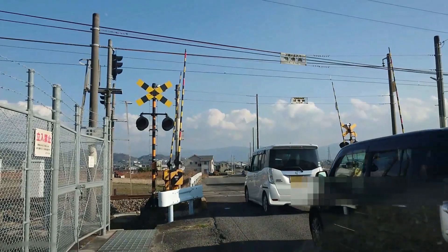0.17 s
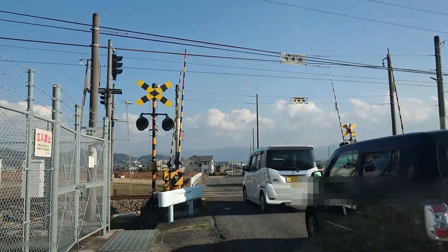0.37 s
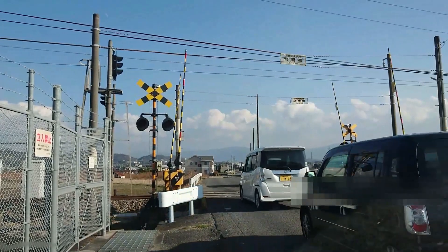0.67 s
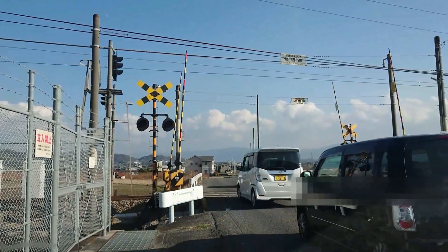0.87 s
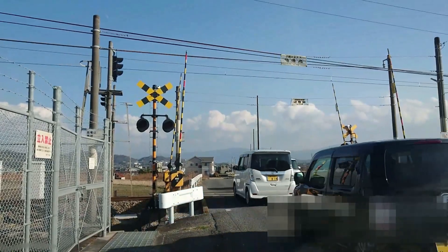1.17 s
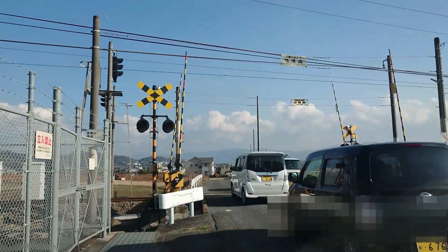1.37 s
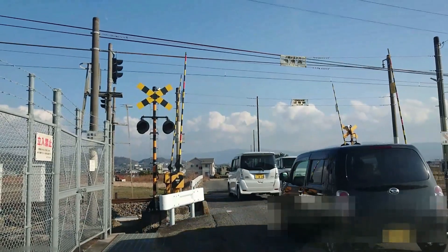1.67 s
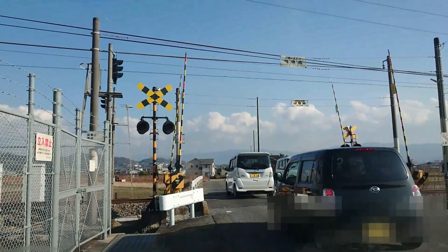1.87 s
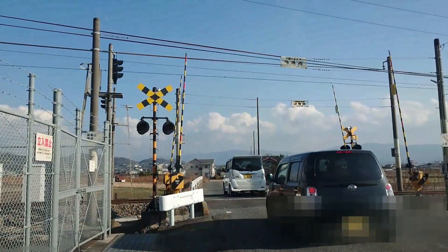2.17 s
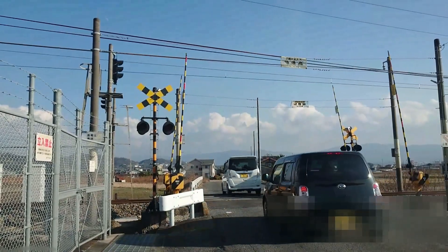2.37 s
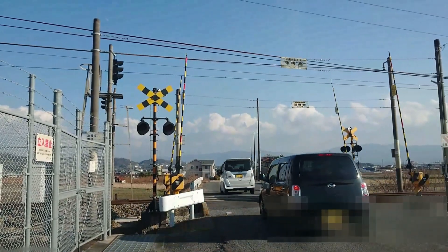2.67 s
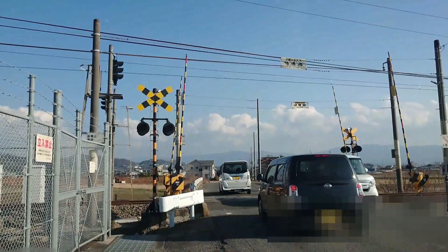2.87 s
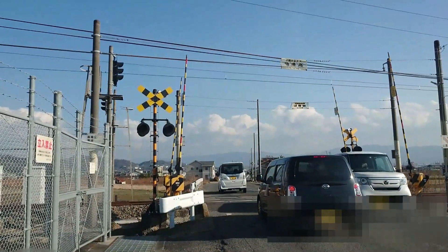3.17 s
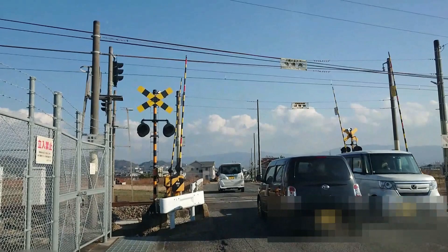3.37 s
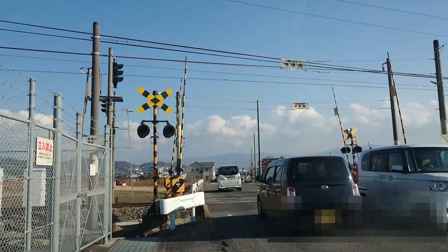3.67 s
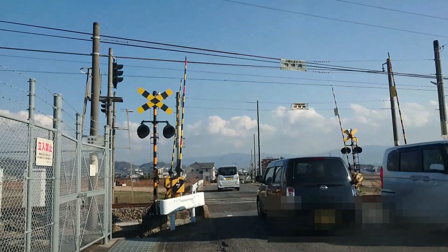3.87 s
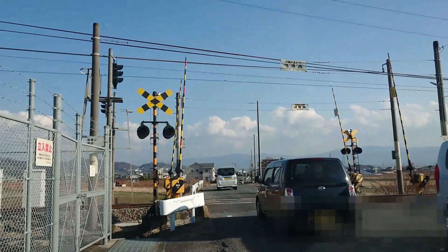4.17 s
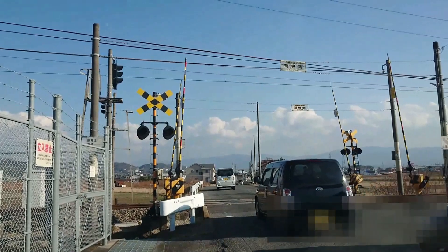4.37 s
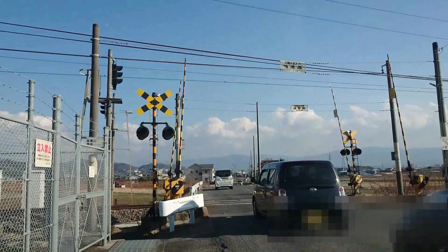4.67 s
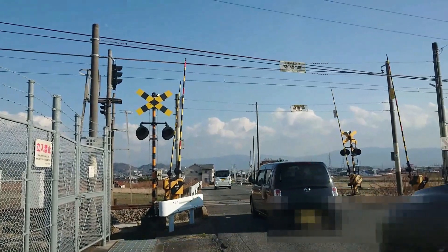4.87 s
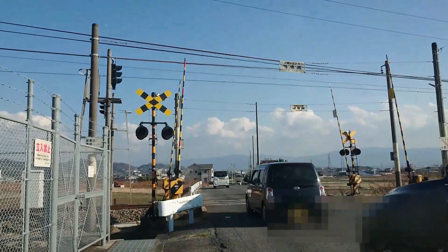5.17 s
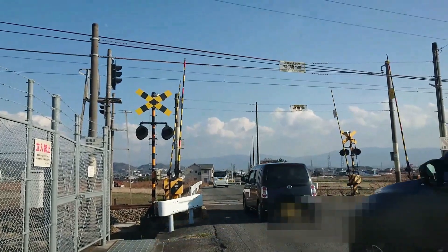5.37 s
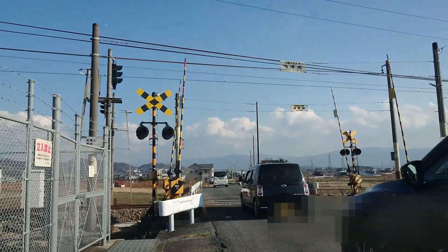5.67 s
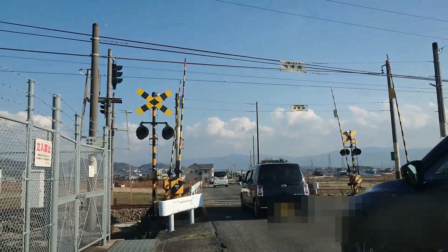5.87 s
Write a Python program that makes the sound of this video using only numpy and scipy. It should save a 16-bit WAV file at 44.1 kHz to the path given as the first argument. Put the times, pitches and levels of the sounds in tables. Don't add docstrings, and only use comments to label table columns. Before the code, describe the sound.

Slow traffic passes close at a level crossing: humming idling engines, dull wheel thumps, gritty tyre scrapes and buffeting gusts, swelling before a sudden cut.

```python
import sys
import numpy as np
from scipy import signal
from scipy.fft import rfft, irfft, next_fast_len
from scipy.io import wavfile
from scipy.ndimage import uniform_filter1d, map_coordinates

SR = 44100
rng = np.random.default_rng(int(sys.argv[2]) if len(sys.argv) > 2 else 0)


def invert_db(level):
    return 10 ** (np.asarray(level, dtype=float) / 20)


def digitize_waveform(pressure):
    field = np.atleast_2d(pressure).T
    bounded = np.clip(field, -1, 1)
    quanta = np.round(bounded * 32767).astype(np.int16)
    wavfile.write(sys.argv[1], SR, quanta)


N = 265923
T = np.arange(N) / SR
BASS_LAG, ROAR_LAG, ECHO_LAG, BESIDE_LAG = 9, 8, 39, 17


def unit(x):
    return x / np.sqrt(np.mean(x ** 2))


def curve(points, **ends):
    return np.interp(T, *np.transpose(points), **ends)


def bump(s, half):
    return np.clip(1 - np.abs(T - s) / half, 0, 1)


def walk(rate):
    hold = int(SR / 64 / rate) + 1
    held = np.repeat(rng.standard_normal(400), hold)[:N // 64 + 2]
    slewed = uniform_filter1d(uniform_filter1d(held, hold), hold)
    return 1.3 * np.interp(T, np.arange(len(held)) * 64 / SR, slewed)


def ring(x, hz, t60):
    pole = np.exp(2j * np.pi * hz / SR - np.log(1000) / (t60 * SR))
    return signal.lfilter([1], [1, -pole], x).imag


def shaped(x, shape, outside_db):
    size = next_fast_len(N, True)
    hz, db = np.transpose(shape)
    log_hz = np.log(np.maximum(np.arange(size // 2 + 1) * SR / size, 1))
    gain_db = np.interp(log_hz, np.log(hz), db, left=outside_db, right=outside_db)
    return irfft(rfft(x, size) * invert_db(gain_db), size)[:N]


def patchy(shape, patchy_db, rate):
    noise = shaped(rng.standard_normal(N), shape, outside_db=-120)
    f, t, tiles = signal.stft(noise, SR, nperseg=1024, noverlap=768)
    flicker = np.array([np.interp(t, T[::64], walk(rate)[::64]) for _ in range(20)])
    band = np.clip(2 * np.log2(np.maximum(f, 1) / 30), 0, 19)
    grid = np.meshgrid(band, range(len(t)), indexing="ij")
    db = patchy_db * map_coordinates(flicker, grid, order=1)
    return unit(signal.istft(tiles * invert_db(db), SR, nperseg=1024, noverlap=768)[1][:N])


def apart(shape, patchy_db, rate):
    return np.array([patchy(shape, patchy_db, rate) for _ in range(2)])


def pan(db):
    return invert_db(np.array([db, -db]) / 2)


def ports(x, lag, pan_db):
    late = np.interp(T - lag / SR, T, x)
    return np.array([late * invert_db(pan_db / 2), x * invert_db(-pan_db / 2)])


def place(s, shapes):
    out = np.zeros((2, N + SR))
    for t, shape in zip(s, shapes):
        start = int(t * SR)
        out[:, start:start + shape.shape[-1]] += shape
    return out[:, :N]


def trackside_hum():
    hum = invert_db(-53 + 1.2 * walk(4)) * np.sin(2 * np.pi * 365 * T)
    return ports(hum, 0, 9.3)


# start_s, length_s, level_db, port (0 left, 1 right)
GUSTS = [(-.1, 0.25, -7, 0), (0.16, 0.19, -19.5, 0), (0.333, 0.2, -16, 0), (-.1, 0.36, -20, 1),
         (0.478, 0.1, -22.5, 1), (0.977, 0.2, -21, 1), (3.422, 0.19, -25.5, 1), (4.091, 0.54, -32.5, 1),
         (5.1, 0.21, -30, 1), (5.301, 0.26, -32, 0), (3.337, 0.16, -42, 0)]


def wind():
    colour = [(25, -29.5), (50, -7.5), (90, 9.5), (160, -5.5), (300, -20.0), (600, -53.0), (1200, -45.0)]
    strength = np.zeros((2, N))
    for s, length, db, port in GUSTS:
        strength[round(port)] += invert_db(db) * np.sin(np.pi * np.clip((T - s) / length, 0, 1))
    return apart(colour, 7.0, 25) * strength


# start_s, level_db (peak), left_minus_right_db, pitch_hz, snap_db
SLAPS = [(.008, -12.5, -28, 128.4, -52.5), (0.1019, -2.5, -17, 170, -26.5), (0.113, -9.5, -24, 126, -21),
         (0.512, -14, -24, 121, -34), (0.5579, -10, -25, 105, -57), (1.7674, -8, -15.5, 160, -36),
         (3.401, -9.5, -27, 122, -42), (3.7867, -21, -29, 420, -16), (3.7932, -31, -14, 503.9, 4),
         (3.8081, -13.5, 40, 200, -35), (3.8107, -13.5, -24, 149, -31), (4.6016, -11, -28, 380, -2.5),
         (4.6223, -30.5, -20.5, 300, 7.5), (4.6268, -30, -20, 300, 17), (5.182, -21.5, -22.5, 201, -14),
         (4.615, -27, -19, 300, 1), (4.553, -24.5, -22.5, 330, -13.5), (4.571, -23, -21, 332, -12),
         (4.6246, -27.5, -19, 500, -4), (4.223, -24.5, -26, 200, -16)]


def slaps():
    t = np.arange(SR // 10) / SR
    grit = rng.standard_normal((len(SLAPS), len(t)))
    shapes = []
    for (s, db, pan_db, hz, snap_db), noise in zip(SLAPS, grit):
        turns = hz * t + .36 * (1 - np.exp(-t / .0005)) - .2 * (1 - np.exp(-t / .0025))
        swell = (1 - np.exp(-t * hz / .5)) * np.exp(-t * hz / 0.47)
        push = -3.2 * np.sin(2 * np.pi * turns) * swell
        hollow = 0.62 * unit(ring(ring(noise, 650, 0.0049), 1000, .003))
        knock = hollow + 1.5 * np.sin(2 * np.pi * 850 * t)
        snap = invert_db(snap_db) * knock * np.exp(-t / 0.0012) * (1 - np.exp(-t / 0.00042))
        far_port_db = np.minimum([[pan_db], [-pan_db]], 0)
        shapes.append(invert_db(db + 7.0 + far_port_db) * (push + snap))
    return place(np.array(SLAPS)[:, 0], shapes)


# start_s (peak), half_length_s,
# roar_db, hiss_db, rumble_db
SCUFFS = [
    (3.79, 0.098, 2.5, 2, 2.5),
    (4.23, .07, 1, 4, 0.5),
    (4.598, 0.073, 4.5, 4, 7.5),
    (4.635, .025, 3.5, 9, 3.5),
    (2.39, .08, -1, -0.7, 5),
    (2.88, .06, 2, -0.5, 1.5),
]


def scuff_db():
    return sum(np.outer(dbs, bump(s, half)) for s, half, *dbs in SCUFFS)


# start_s, level_db over usual
NEARNESS = [(0, 1), (.5, 1.5), (.87, 0), (1.3, 3.5), (1.8, -0.5), (2.8, -1), (3.6, 0), (4.3, -0.5),
            (4.75, 1), (5.02, 3.5), (5.2, 11.5), (5.32, 10.5), (5.4, 12.5)]


def near_db():
    return curve(NEARNESS)


# pitch_hz, level_db per Hz
RUMBLE = [(18, -37), (30, 2.5), (43, -11), (59, -2.5), (86, -11), (146, -20.5), (178, -13), (257, -29),
          (297, -26.5), (649, -45.5), (900, -40.5), (1170, -63.5), (1980, -120)]
# start_s, level_db
JOLTING = [(0, 0.5), (.06, -23), (.19, -4.5), (.48, -3.5), (.75, -5), (1.1, 3), (1.7, -1.5), (2.2, 2),
           (2.9, 1.5), (3.1, -4), (3.6, -2.5), (3.8, -0.5), (4.36, 0), (5.2, 1.5), (5.4, 8)]


def body_rumble():
    shared = ports(patchy(RUMBLE, 2.7, 16), BASS_LAG, -0.53)
    rumble = shared + invert_db(-3.0) * apart(RUMBLE, 1.1, 30)
    return invert_db(-24 + curve(JOLTING) + scuff_db()[2]) * rumble


# pitch_hz, level_db per Hz
ROAR = [(350, -12), (600, -3.5), (764, -14), (1130, -6), (1230, -8), (1410, -8), (2380, -5), (2750, -13.5),
        (4240, -13), (4910, -18.5), (5930, -16.5), (6880, -18.5), (7400, -25), (9620, -61.5), (16300, -120)]


def tyre_roar():
    scuff = scuff_db()
    alike = [(500, 4.0), (1800, -2.0), (3500, -9.0), (7500, -19.5)]
    near = shaped(patchy(ROAR, 1.5, 18), alike, outside_db=8.5)
    direct = invert_db(-1.0) * ports(near, ROAR_LAG, 0)
    left_echo = invert_db(-7.5) * ports(near, ECHO_LAG, 0) * [[1], [0]]
    roar = direct + left_echo + invert_db(1.5) * apart(ROAR, 0.94, 13)
    return invert_db(-46.5 + near_db() + scuff[0]) * pan(4 - 1.3 * scuff[1]) * roar


# pitch_hz, level_db per Hz
HISS = [(4470, -53), (7600, -30.5), (8010, -10), (9080, -14), (9540, -3.5), (10000, -3.5), (11500, -6),
        (14100, -8), (15100, -11.5), (16000, -20.5)]
# start_s, ticks_per_s
TICK_HZ = [(0, 21.4), (1.8, 21.2), (2.2, 22.6), (2.6, 25), (3.1, 27.5), (3.6, 25.5), (5.4, 25)]
# start_s, ratio
TICK_DEPTH = [(0, 0.28), (.7, 0.76), (1.9, 0.59), (3.2, 0.71), (4, 0.23), (5.4, 0.16)]
# start_s, left_minus_right_db
HISS_PAN_DB = [(0, 13.3), (1.0, 7.7), (2.5, 3.7), (4, 7.3), (5.4, 5.16)]


def valve_hiss():
    scuff = scuff_db()
    turn = np.cumsum(curve(TICK_HZ)) / SR
    puff = np.exp(-((turn % 1 - .5) / 0.17) ** 2)
    puff = puff * invert_db(2.5 * rng.standard_normal(200))[turn.astype(int)]
    puff = puff * curve(TICK_DEPTH)
    steady = invert_db(-2.0) * patchy(HISS, 1.1, 18) + apart(HISS, 0.8, 17)
    hiss = steady * (1 + puff * np.array([[1], [.4]]))
    pan_db = curve(HISS_PAN_DB) - 1.3 * scuff[1]
    return invert_db(-53.5 + 0.83 * near_db() + scuff[1]) * pan(pan_db) * hiss


# start_s, level_db (peak), pitch_hz (ring), rattle_db
RAILS = [(0.346, -25, 332, -2), (0.967, -18, 189, -27), (1.638, -20.5, 206.5, -5), (1.675, -18, 204, -0.5),
         (1.718, -25, 196, 6), (2.094, -22.5, 212, 5), (2.284, -31, 220, 7), (2.317, -24, 205, 8),
         (2.341, -20.5, 213, -8), (2.355, -26.5, 243, 8.5), (2.394, -12.5, 184.3, -0.5),
         (2.371, -13.5, 129.5, -5), (2.407, -19.5, 110, -15), (2.439, -24.5, 213, 4), (2.598, -25, 228, -1),
         (2.826, -16, 192, -2.5), (2.869, -7, 180, -7), (4.886, -17, 187.4, -7), (4.949, -25, 198.6, 0),
         (5.012, -23.5, 205, -9), (5.06, -19, 209, -4.5)]


def rails():
    t = np.arange(SR // 4) / SR
    grains = rng.standard_normal((len(RAILS), len(t))) ** 3
    rattle = signal.lfilter([1], [1, -.9], grains)
    fade = 10 ** (-3 * t / 0.13)
    shapes = []
    for (s, db, hz, rattle_db), noise in zip(RAILS, rattle):
        modes = np.sin(2 * np.pi * hz * t) + 0.24 * np.sin(2 * np.pi * .88 * hz * t)
        body = modes * (1 - np.exp(-t / 0.0035))
        panels = unit(ring(noise, 570.0, 0.007))
        shake = invert_db(rattle_db - 1.5) * panels * (1 - np.exp(-t / 0.01)) ** 2
        shapes.append(invert_db(db) * fade * np.array([body, shake]))
    bodies, shakes = place(np.array(RAILS)[:, 0], shapes)
    return ports(bodies, BASS_LAG, -0.62) + ports(shakes, ECHO_LAG, 0.1)


# start_s, level_db (peak), left_minus_right_db, pitch_hz, edge_db (bright edge)
CLICKS = [(0.102, -26, -13.5, 4620, -1), (0.1114, -29, -7, 4900, -8), (1.7674, -42, -11, 4870, -8),
          (3.7869, -33, 0.5, 3590, -16), (3.7868, -26, -14.5, 1430, -14), (4.6268, -33, -15.5, 1396, -21),
          (0.1018, -35, -5, 1380, -17), (2.402, -24.5, 2, 1300, -20), (3.7934, -37, -8, 4394, 2),
          (0.872, -33.5, 16, 2454, 1), (1.225, -35, 2, 2232, 9), (1.6608, -29.5, -7, 4445, -14),
          (1.673, -36, 4, 3580, 2), (1.7724, -35, 13, 4020, 11), (1.8023, -38.5, 2, 4520, 12),
          (0.0707, -44, 6.5, 4000, 10), (0.4449, -44, 10.5, 4000, 10), (0.7312, -55, 11, 3900, 9),
          (3.48, -29.5, 1.5, 4600, -1), (3.7873, -23, 6, 2550, -17), (3.81, -33.5, 17, 3000, 4.5),
          (4.2242, -33.5, -3.5, 5930, 7.5), (4.6227, -27, 5, 2210, -16), (4.626, -33, 13.5, 4860, 2)]


def clicks():
    t = np.arange(SR // 10) / SR
    grit = rng.standard_normal((len(CLICKS), 2, len(t)))
    bright = signal.butter(4, 9200, "high", fs=SR, output="sos")
    envelope = (1 - np.exp(-t / 0.00081)) * np.exp(-t / 0.0037)
    shapes = []
    for (s, db, pan_db, hz, edge_db), noise in zip(CLICKS, grit):
        dull = 0.85 * unit(ring(noise, hz, 0.001))
        ping = 1.5 * np.sin(2 * np.pi * hz * t) * np.exp(-t / 0.0012)
        edge = invert_db(edge_db + 5) * unit(signal.sosfilt(bright, noise)) * np.exp(-t / 0.00402)
        level = invert_db(db - 3.5 + np.array([[pan_db], [-pan_db]]) / 2)
        shapes.append(level * (dull + ping + edge) * envelope)
    return place(np.array(CLICKS)[:, 0], shapes)


# start_s, level_db
ARRIVAL = [(4.85, -67.5), (5.0, -45.5), (5.06, -41), (5.12, -43.5), (5.18, -35), (5.3, -41), (5.41, -49)]
# pitch_hz, level_db per Hz
ARRIVAL_COLOUR = [(250, -13), (350, -2.5), (450, -12.5), (800, -25), (1150, 9.5), (1500, 11.5),
                  (1900, -11.5), (2600, 8.5), (2900, -15), (6500, -11)]


def arrival():
    shared = ports(patchy(ARRIVAL_COLOUR, 2.8, 30), BESIDE_LAG, 2.9)
    separate = invert_db(-4.0) * apart(ARRIVAL_COLOUR, 2.9, 30)
    return invert_db(curve(ARRIVAL, left=-120)) * (shared + separate)


# start_s, pitch_hz, level_db
WHINE = [(1.18, 1100, -62), (1.27, 1105, -45), (1.36, 1110, -41), (1.47, 1150, -45), (1.53, 1110, -52),
         (1.6, 1085, -49), (1.72, 1080, -60)]


def belt_whine():
    s, hz, db = np.transpose(WHINE)
    sway, breaks_db = 1 + .022 * walk(60), 1.5 * walk(30)
    phase = 2 * np.pi * np.cumsum(np.interp(T, s, hz) * sway) / SR
    level_db = np.interp(T, s, db, left=-120, right=-120) + breaks_db
    return ports(invert_db(level_db) * np.sin(phase), ROAR_LAG, 3.5)


# pitch_hz, half_width_hz, level_db
BOOMS = [(98.7, 5.6, 12), (192, 13, 14)]


def engine(table, wobble, rough_db, upper_db=(), dip_db=0):
    s, hz, db = np.transpose(table)
    speed = np.interp(T, s, hz)
    note_db = np.interp(T, s, db)
    phase = 2 * np.pi * np.cumsum(speed * (1 + wobble * walk(14))) / SR
    already_on = (s[0] < .01) * (T < 1)
    gate = np.clip(np.minimum(T - s[0], s[-1] + .05 - T) / .05 + already_on, 0, 1)
    load_db = 0.42 * (note_db - np.max(db))
    dbs = [note_db - dip_db]
    for multiple, level_db in enumerate(upper_db, 2):
        boom_db = sum(gain / (1 + ((multiple * speed - centre) / width) ** 2) for centre, width, gain in BOOMS)
        dbs.append(level_db + load_db + boom_db)
    note = 0
    for k, multiple_db in enumerate(dbs):
        size = invert_db(multiple_db + (k + 2.0) * rough_db * walk(20))
        note = note + size * np.sin((k + 1) * (phase + k))
    return gate * np.sqrt(2) * note


# start_s, pitch_hz, level_db
DRONE = [(.1, 572, -67), (.3, 600, -55.5), (.47, 589.5, -52.5), (.6, 608, -54), (.77, 602, -53),
         (.9, 625, -63), (1.1, 614, -54)]
# start_s, pitch_hz, level_db
GEARS = [
    [(.85, 511, -49), (1.05, 499, -62), (1.25, 504, -48), (1.4, 496, -58)],
    [(1.45, 703, -45), (1.55, 694, -52), (1.63, 686, -53)],
    [(2.05, 601, -53), (2.3, 605.5, -49), (2.45, 609, -51.5), (2.7, 584, -57)],
]
# start_s, pitch_hz, level_db
INTAKE = [(5.05, 356.7, -55), (5.15, 358.8, -39), (5.3, 350.2, -40.5), (5.4, 339, -43)]


def whirrs():
    fan = ports(engine(DRONE, wobble=0.044, rough_db=2.5), ROAR_LAG, 1.5)
    gears = sum(ports(engine(gear, wobble=.02, rough_db=2.0), ROAR_LAG, 1.5) for gear in GEARS)
    intake = ports(engine(INTAKE, wobble=0.02, rough_db=-0.5), BASS_LAG, -2)
    return fan + gears + intake


# start_s,
# pitch_hz, level_db
IDLER = [(0.0, 53.2, -5), (0.042, 50.9, -11.5), (0.136, 52.5, -26), (0.236, 57.14, -20.5),
         (0.45, 60.84, -28.5), (0.788, 49.3, -34), (1.05, 48, -25)]
CREEPER = [(0.55, 68, -24), (0.63, 64.2, -37), (1.216, 66.9, -30), (1.45, 72, -53), (1.87, 71, -73),
           (2.17, 65.9, -29), (2.3, 69, -51)]
CREEPER_SECOND = [(.6, 126.7, -49), (.75, 129.7, -41), (1.1, 131.3, -38), (1.4, 137.8, -42.5), (1.65, 142, -49)]
STARTER = [(1.0, 43.15, -39), (1.13, 45.56, -28.5), (1.276, 50.5, -15.5), (1.36, 56.56, -19),
           (1.59, 60.8, -29.5), (1.62, 60, -25)]
IDLER_LATER = [(1.55, 47.8, -40), (1.6, 48.1, -30), (2.004, 48, -21), (2.076, 43.6, -30), (2.14, 44.6, -26),
               (2.262, 46.8, -24), (2.344, 48, -52), (2.4, 46.5, -18)]
LEADER = [(2.35, 53.5, -18), (2.67, 54.8, -20), (2.85, 49.3, -9.5), (3.2, 52.72, -16.5), (3.5, 49.93, -24),
          (3.87, 59.36, -21), (4.19, 56.45, -18.5), (4.9, 58.75, -16), (5.4, 60.65, -25.5)]
CREEPER_LATE_SECOND = [(2.5, 123.1, -26), (2.6, 125.9, -39), (3.236, 139.7, -43), (3.51, 126.5, -39.5),
                       (3.8, 129.6, -36.5), (3.9, 125.3, -31.5)]
BRAKER = [(3.45, 176, -46), (3.7, 178.5, -39.5), (4.0, 176, -42), (4.3, 167, -37), (4.4, 167, -55)]
LEADER_SECOND = [(4.2, 113.1, -65), (4.4, 113.9, -34), (4.8, 116.4, -35), (5.1, 118.6, -32), (5.4, 115.4, -31)]
FOLLOWER = [(4.3, 36.63, -50), (4.47, 44.8, -19), (4.505, 48.7, -17), (4.55, 50.8, -20.5), (4.61, 52, -9),
            (4.655, 54.3, -21), (4.7, 57.5, -25.5), (5.0, 65.38, -19.5), (5.2, 69.83, -22),
            (5.33, 72.3, -30), (5.4, 78.7, -19)]
# start_s (deepest), drop_db, half_length_s
NOTE_DIPS = [(2.459, 26, 0.047), (2.57, 16, 0.054), (2.813, 23, 0.12), (3, 14.5, 0.16), (3.36, 7.5, 0.11),
             (3.785, 25, 0.017), (4.08, 15, 0.033), (4.757, 31, 0.046), (4.575, 33, 0.13)]


def engines():
    dips_db = sum(drop_db * bump(s, half) for s, drop_db, half in NOTE_DIPS)
    # (car, left minus right dB, 2nd and 3rd multiple dB)
    cars = [(IDLER, 1.5, ()), (IDLER_LATER, 1.5, ()), (CREEPER, .1, (-39,)), (CREEPER_SECOND, .1, ()),
            (CREEPER_LATE_SECOND, .1, ()), (STARTER, 2.5, (-36, -48)), (LEADER, 3, (-45, -50)),
            (LEADER_SECOND, 1.5, ()), (BRAKER, 1.5, ()), (FOLLOWER, 3, (-37, -39))]
    out = np.zeros((2, N))
    for car, pan_db, upper_db in cars:
        dip_db = dips_db * (car is LEADER)
        note = engine(car, wobble=0.0051, rough_db=0.7, upper_db=upper_db, dip_db=dip_db)
        out += ports(note, BASS_LAG, pan_db)
    return out


# pitch_hz, left_minus_right_db
PORT_TILT = [(200, -2), (700, 0.5), (1300, -1), (2400, 5.5), (3300, 2.5), (4500, -2.5), (7000, -4),
             (10000, 4.5), (13000, -4.5), (15500, -5.5)]


def scene():
    road = body_rumble() + tyre_roar() + valve_hiss()
    traffic = [shaped(x, np.array(PORT_TILT) * [1, side], outside_db=-5.0) for x, side in zip(road, (.5, -.5))]
    background = trackside_hum() + wind() + slaps()
    return background + traffic + rails() + clicks() + arrival() + belt_whine() + whirrs() + engines()


# pitch_hz, chance
DROPOUT = [(4800, 0), (5500, .06), (6300, .27), (7000, .6), (7600, .8), (8300, .65), (9000, .45),
           (9500, .03), (11500, .08), (12600, .17), (13800, .33), (14600, .5), (15200, .75), (15800, .9)]


def starved(x):
    f, t, tiles = signal.stft([x[0] + x[1], x[0] - x[1]], SR, nperseg=1024)
    luck = rng.random((len(f) // 8 + 1, len(t) // 3 + 1))
    luck = np.repeat(np.repeat(luck, 8, axis=0), 3, axis=1) / [[[1]], [[1.1]]]
    kept = luck[:, :len(f), :len(t)] > np.interp(f, *np.transpose(DROPOUT))[:, None]
    mid, side = signal.istft(tiles * kept, SR, nperseg=1024)[1][:, :N]
    return np.array([mid + side, mid - side]) / 2


def band_limit(x):
    return signal.sosfilt(signal.butter(12, 16480, fs=SR, output="sos"), x)


# start_s, level_db
CUT = [(0, -24), (.006, 0), (5.402, 0), (5.408, -8), (5.42, -34), (5.438, -44), (5.446, -70), (5.47, -110)]


def record(dry):
    low_cut = signal.butter(6, 36, "high", fs=SR, output="sos")
    top_cut = signal.ellip(10, .3, 70, 15700, fs=SR, output="sos")
    dead_spot = signal.butter(1, [7300, 8200], "bandstop", fs=SR, output="sos")
    overloaded = np.tanh(0.82 * dry) / 0.94
    heard = starved(signal.sosfilt(np.vstack([low_cut, top_cut, dead_spot]), overloaded))
    return band_limit(heard * invert_db(curve(CUT, right=-200)))


dry = scene()
out = record(dry)
digitize_waveform(out)
```